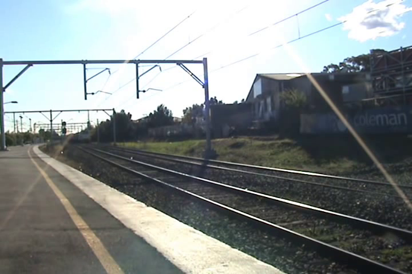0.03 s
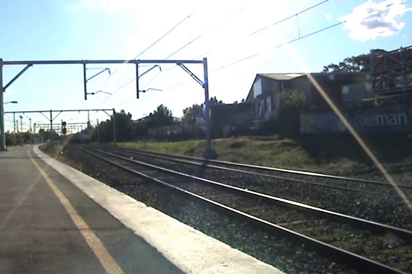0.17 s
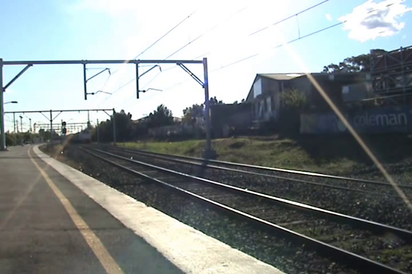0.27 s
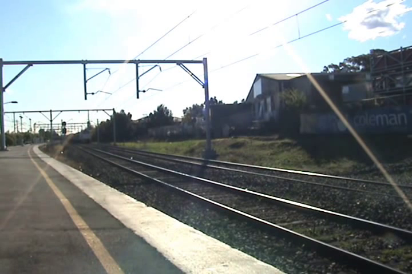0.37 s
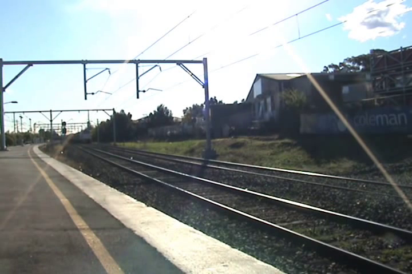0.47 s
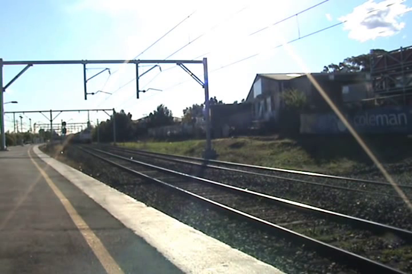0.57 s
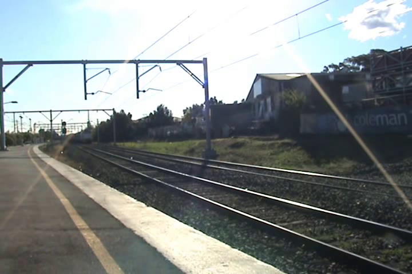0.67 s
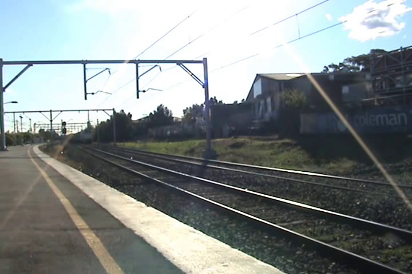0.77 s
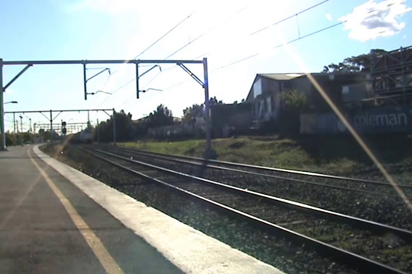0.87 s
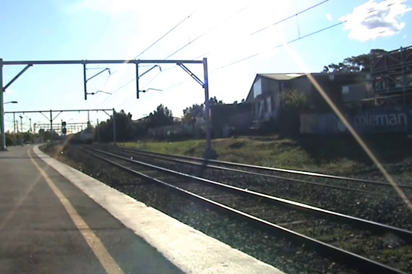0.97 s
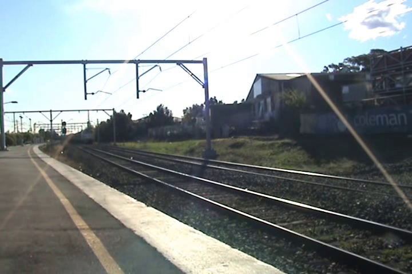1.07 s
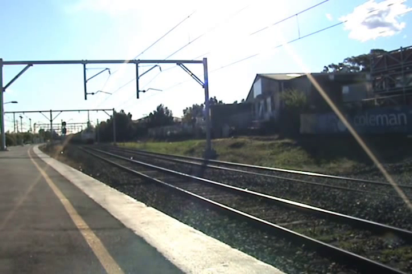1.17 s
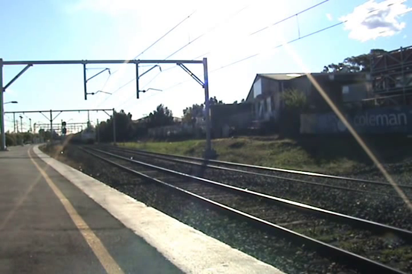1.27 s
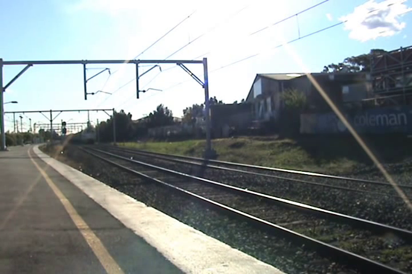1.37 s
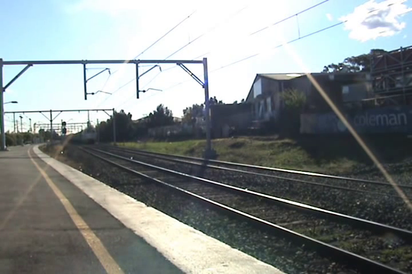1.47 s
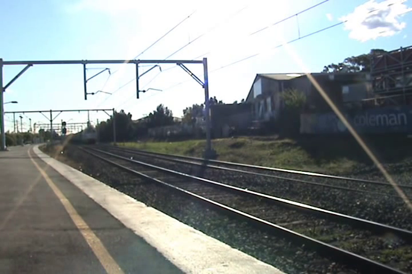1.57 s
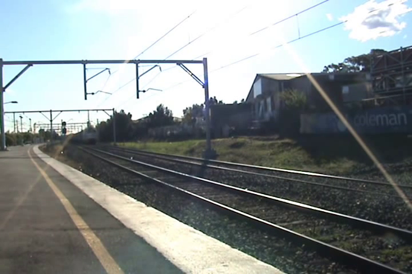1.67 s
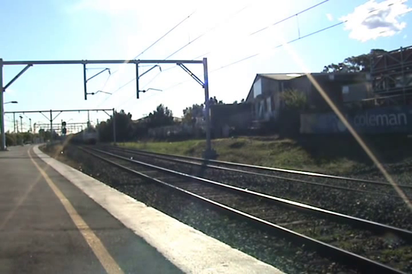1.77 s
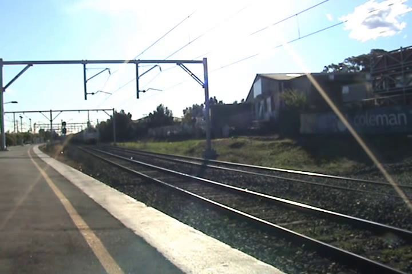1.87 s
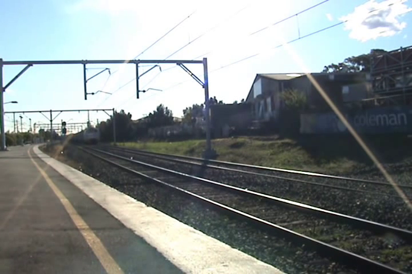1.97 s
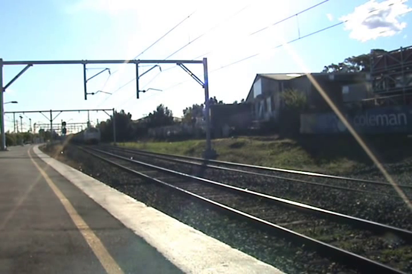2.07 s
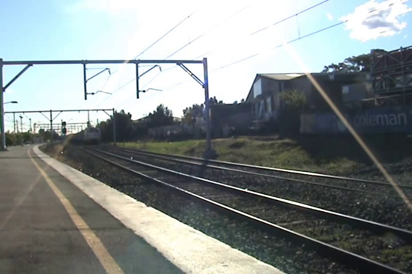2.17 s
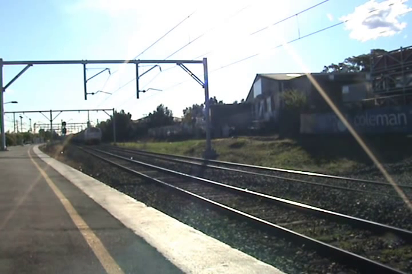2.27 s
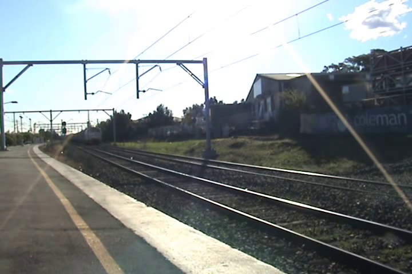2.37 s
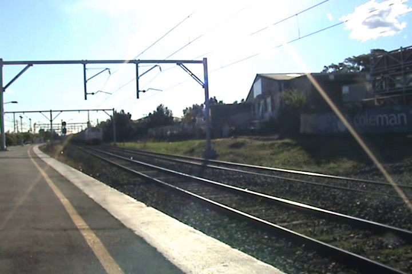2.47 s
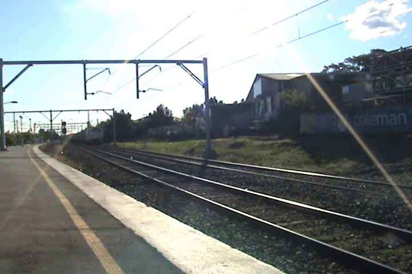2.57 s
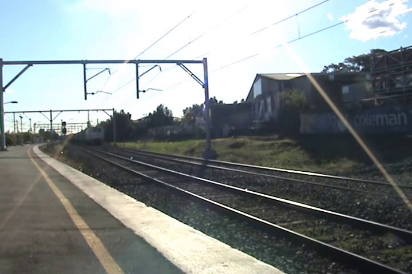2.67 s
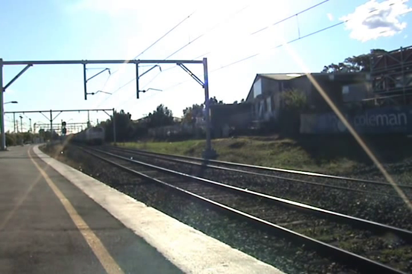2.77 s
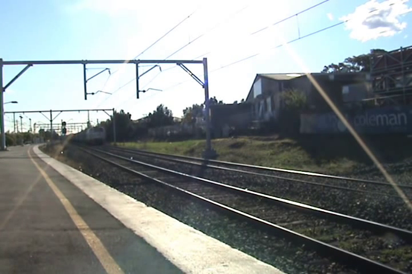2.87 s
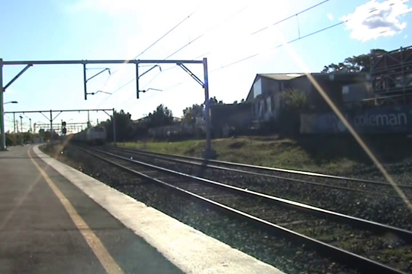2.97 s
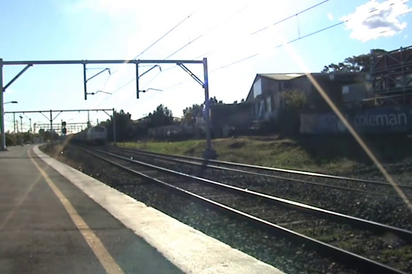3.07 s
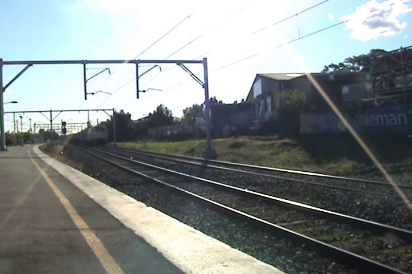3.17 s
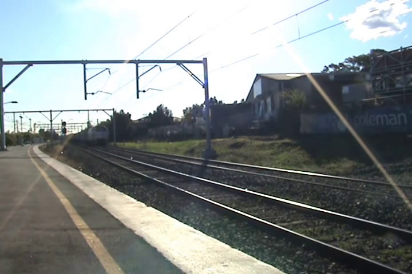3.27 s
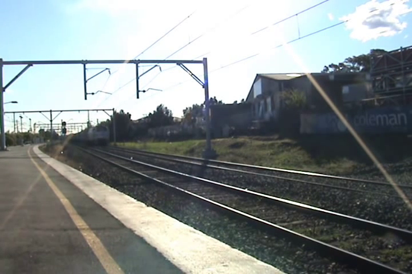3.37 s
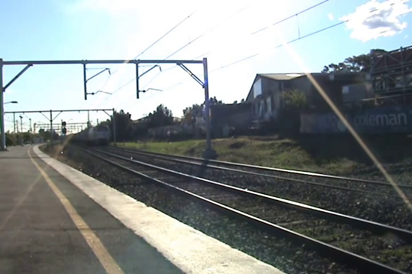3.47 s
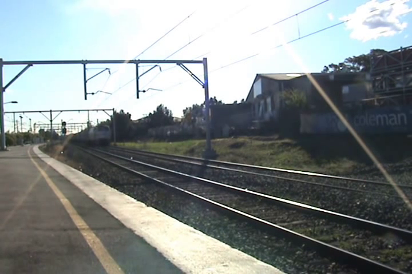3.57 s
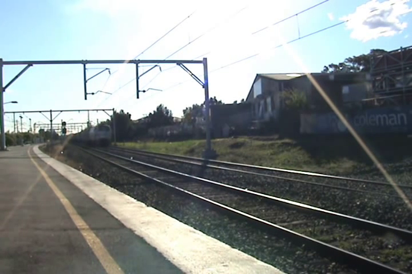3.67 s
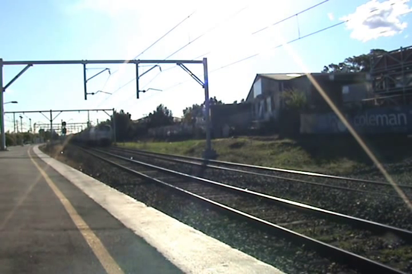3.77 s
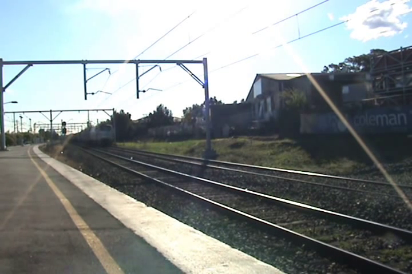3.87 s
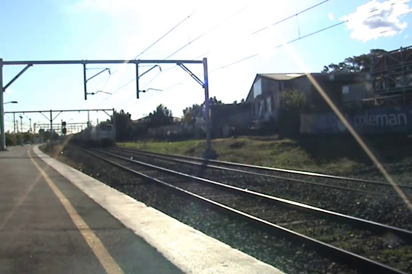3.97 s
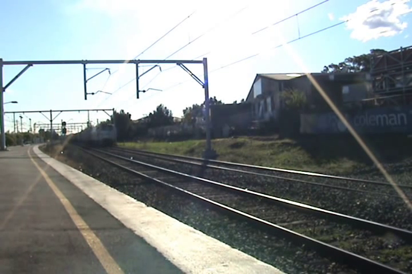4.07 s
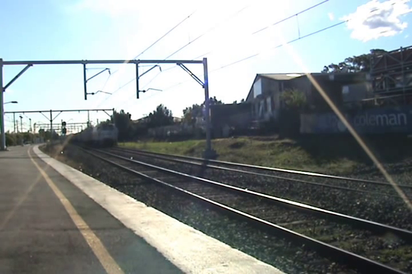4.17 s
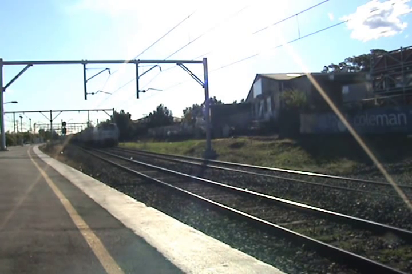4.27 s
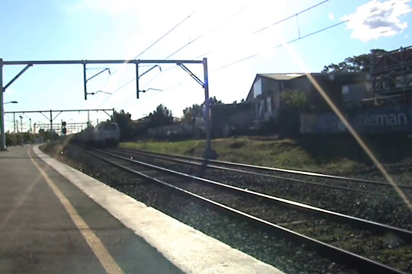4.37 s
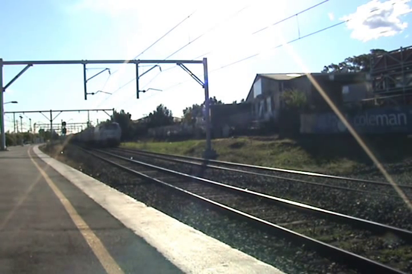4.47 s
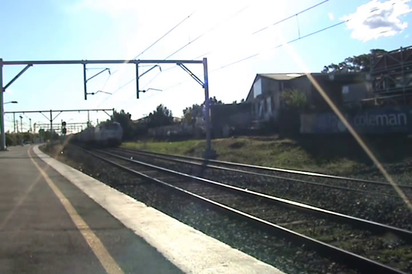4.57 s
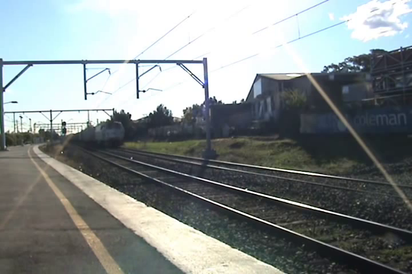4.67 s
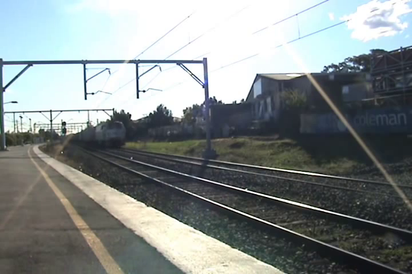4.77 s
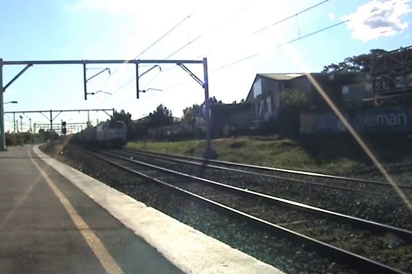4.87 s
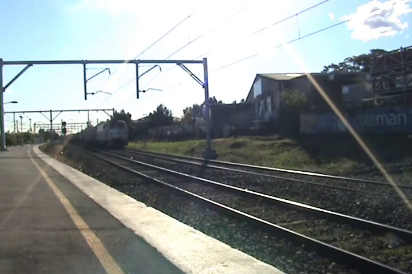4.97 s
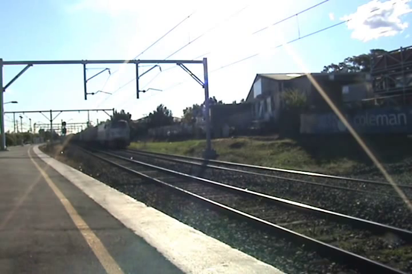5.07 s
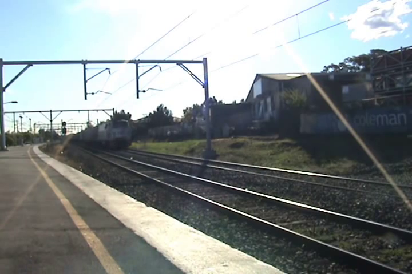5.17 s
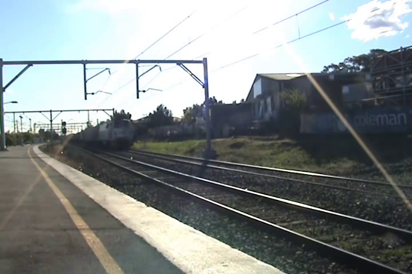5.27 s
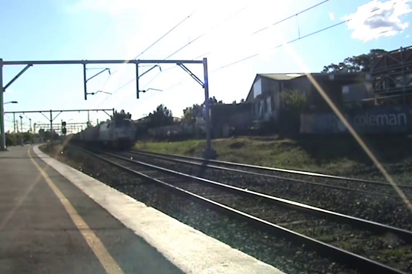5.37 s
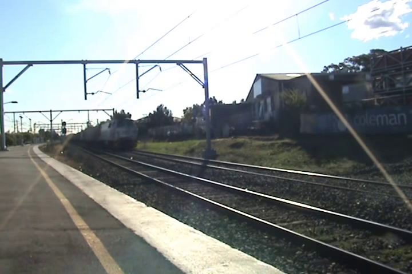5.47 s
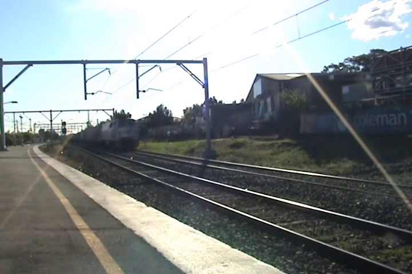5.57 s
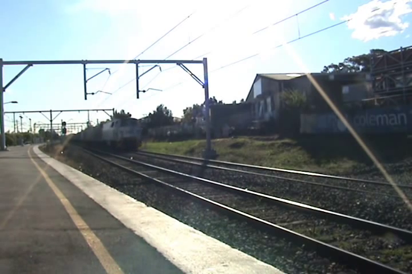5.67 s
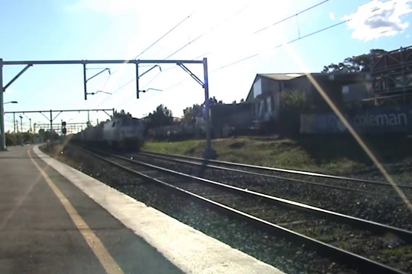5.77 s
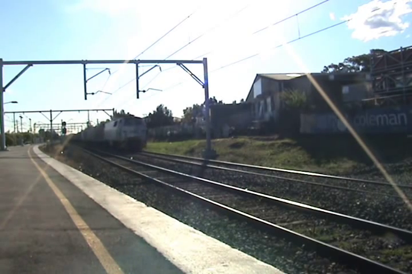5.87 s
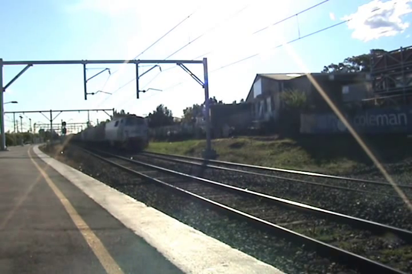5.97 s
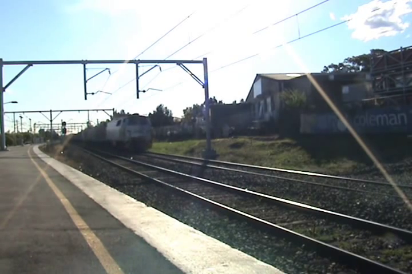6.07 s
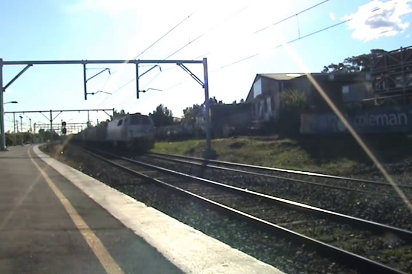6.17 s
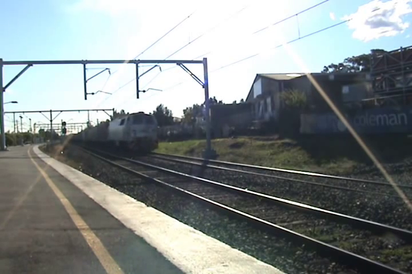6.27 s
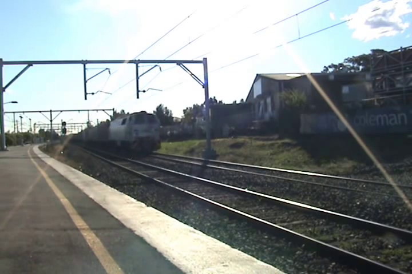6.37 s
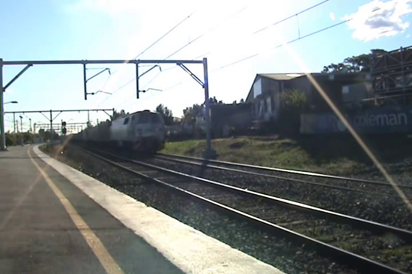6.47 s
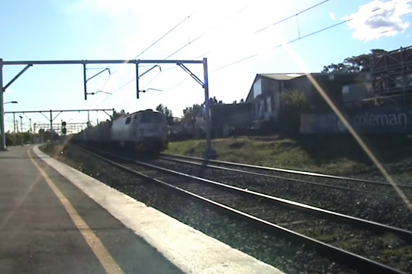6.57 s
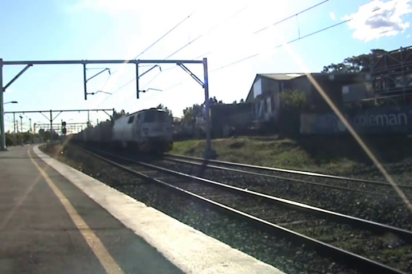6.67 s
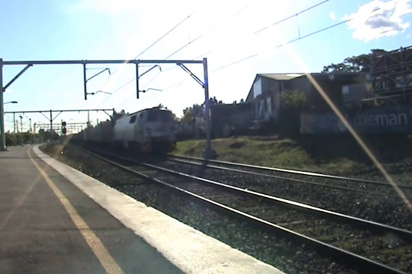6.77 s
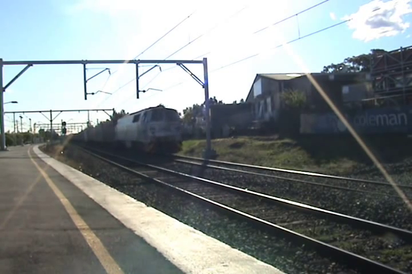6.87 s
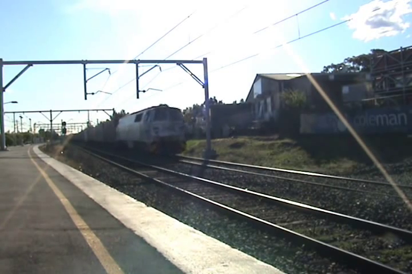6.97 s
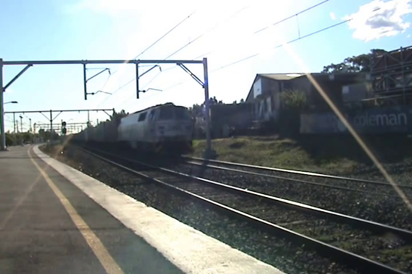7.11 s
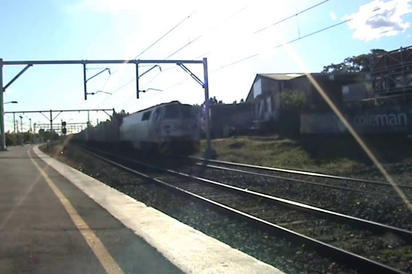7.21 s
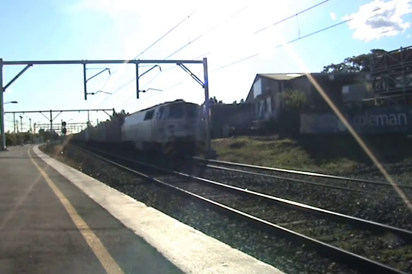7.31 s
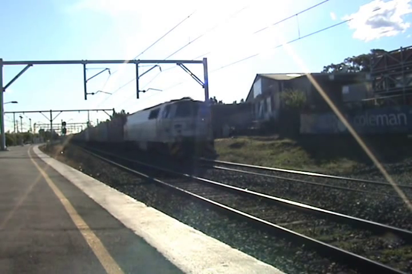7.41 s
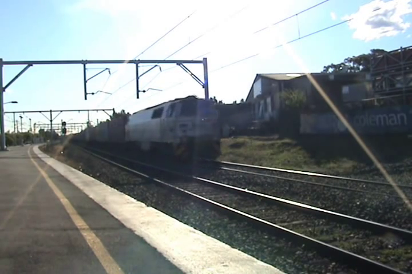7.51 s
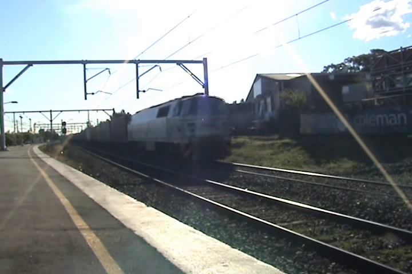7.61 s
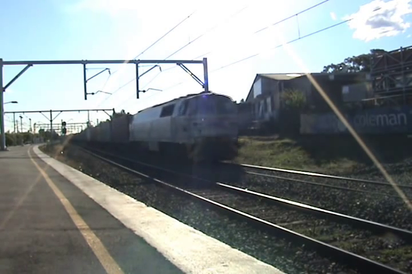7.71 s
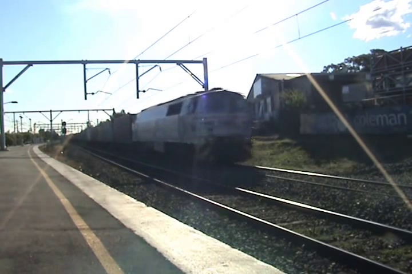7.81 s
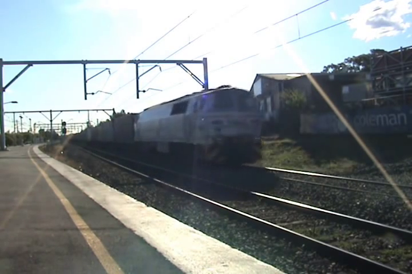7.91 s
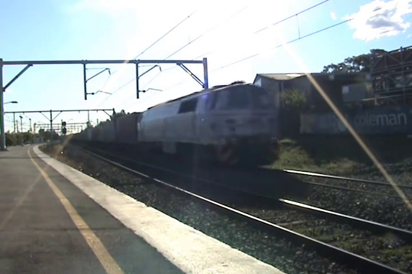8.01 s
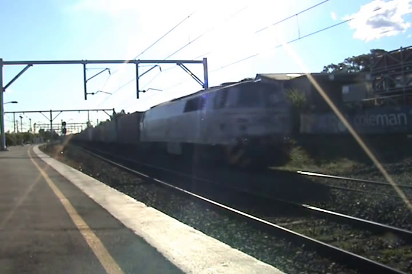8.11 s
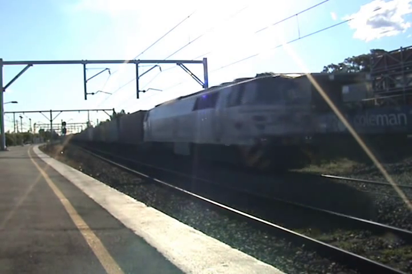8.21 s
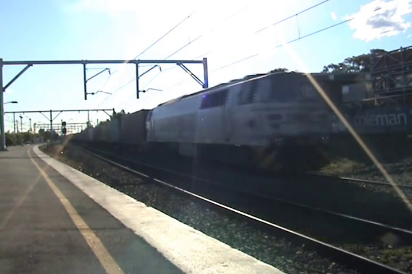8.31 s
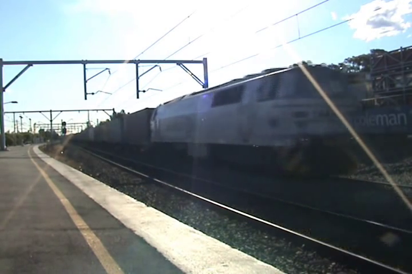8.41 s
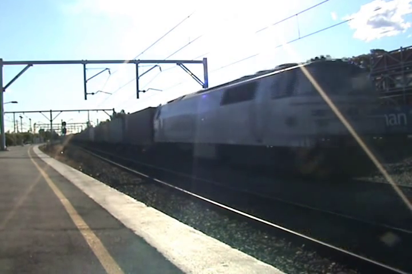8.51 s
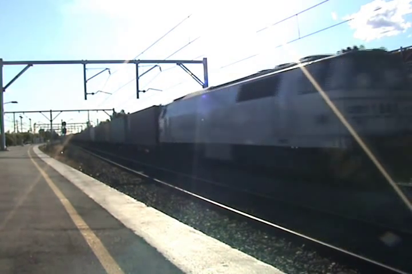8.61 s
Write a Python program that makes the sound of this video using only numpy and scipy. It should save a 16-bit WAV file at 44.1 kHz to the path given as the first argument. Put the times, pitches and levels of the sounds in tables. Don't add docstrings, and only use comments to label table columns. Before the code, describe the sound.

Quiet town hiss, a far hollow bang, then an approaching freight engine's deep throb, roaring wheels, joint clacks and thin metallic singing as it draws level.

```python
import sys
import numpy as np
from scipy import signal
from scipy.fft import rfft, irfft, next_fast_len
from scipy.io import wavfile
from scipy.ndimage import uniform_filter1d

SR = 44100
rng = np.random.default_rng(int(sys.argv[2]) if len(sys.argv) > 2 else 0)


def to_linear_factor(level_db):
    exponent = np.asarray(level_db, float) / 20
    return 10 ** exponent


def int16_out(signal):
    q = np.round(np.clip(np.atleast_2d(signal).T, -1, 1) * 32767)
    wavfile.write(sys.argv[1], SR, q.astype(np.int16))


N = 381465
T = np.arange(N) / SR

# time in seconds, level in dB.
AIR_LEVEL = [(0, -57.5), (1.05, -56), (1.3, -61), (4, -69), (8.65, -61)]
# time in seconds, pitch in Hz, level in dB.
TWITTER_LINE = [(0.04, 8200, -71), (0.12, 8180, -67), (.58, 8120, -70), (0.85, 8200, -65), (1.0, 8120, -64),
                (1.14, 7950, -67)]
# time in seconds, pitch in Hz, level in dB.
SQUEAL_LINE = [
    (0, 3780, -57),
    (.3, 3720, -52),
    (.48, 3690, -54),
    (.68, 3650, -64),
]
# pitch in Hz, width in Hz, level in dB.
BANG_MODES = [(75, 35, -5.5), (202, 33, 5.5), (420, 160, 6), (675, 270, -1), (1130, 440, -5.5),
              (2400, 1200, -25), (4500, 1600, -32)]
BANG_S, BANG_DB, BANG_T60 = 1.036, -17.5, 1
THUD_HZ, THUD_DB, THUD_T60 = 85, 1, 0.14
HOLLOW_T60 = 0.7

# time in seconds, dB over the far level.
NEARNESS_CURVE = [(0, -1), (1, 1), (2, 3.5), (3.4, 6), (4.4, 7.5), (5.6, 8.5), (6.4, 10.5), (7.4, 14),
                  (7.95, 15.5), (8.2, 17), (8.65, 17.5)]
# far level in dB, gain per dB of nearness, bend per dB squared.
BOOM_GROWTH = (-29, 0.94, 0.001)
ROAR_GROWTH = (-32.5, 0.78, 0.0048)
HISS_GROWTH = (-52, 0.95, 0.018)
# frequency in Hz, density in dB per Hz.
RUSH_COLOUR = [(15, -42), (25, -19), (50, 3.5), (87, -3), (107, -1), (130, -10.5), (170, -25), (290, -120)]
BOOM_COLOUR = [(79, -45), (135, -3), (204, -4), (248, -3.5), (307, -2.5), (354, -2.5), (440, -11),
               (570, -33.5), (970, -120)]
ROAR_COLOUR = [(270, -32), (460, 3.5), (845, -1), (1390, -7), (1890, -8), (2260, -10), (2450, -10),
               (2980, -12), (3900, -20), (5070, -40), (8580, -120)]
HISS_COLOUR = [(2410, -16), (4100, -1.5), (4600, -1), (5090, -4), (6150, -7.5), (9500, -18.5), (10300, -21),
               (13400, -43), (22000, -120)]
# pitch in Hz, width in Hz, far and near lift over noise in dB.
BODY_RINGS = [(262, 28, 0.42, 6.7), (360.6, 27, 2.2, 5.3), (391, 20, 3.4, 4.3), (1874, 52, 4.6, 3),
              (2440, 94, 3.3, 3.6), (2990, 180, 0.68, 4.4), (4700, 36, 1, 1.7)]
# time in seconds, peak in dB over the hiss.
JOINT_HITS = [(1.83, 5), (2.24, -2), (3.9, -1), (4.445, 9), (5.24, 6), (5.8376, 4), (6.3784, 7),
              (6.4348, 5), (6.5745, 6), (6.8488, 3), (7.0384, -2), (7.3941, 0), (7.4859, -3), (7.647, 3),
              (8.005, 1), (8.0576, 9.5), (8.285, 7.5), (8.4946, -11)]
JOINT_RISE_S, JOINT_T60 = 0.014, 0.25
# time in seconds, swell in dB.
CAR_LURCHES = [(0, -6), (1.5, 4), (3.1, 4), (5.35, 4.5), (6.6, 1), (6.98, -1.5), (7.28, 1.9), (7.58, 1),
               (8.15, -2.5), (8.55, 2)]
LURCH_S = 0.07
BOOM_LATE_DB = -0.5
CLEAR_S, CLEAR_DB, CLEAR_WIDTH_S = 5.6, 3.5, 0.9

# time in seconds, pitch in Hz, level in dB.
GEAR_WHINE = [(2.5, 400, -47), (4, 363, -37.5), (5, 352, -29.5), (6.2, 364, -26), (6.8, 361.3, -20.5),
              (7.5, 349, -16), (8, 364, -21), (8.65, 350, -22.5)]
# start in seconds, length in seconds, pitch in Hz, level in dB.
FLANGE_CRIES = [(6.36, .08, 3050, -35), (7.99, .09, 2900, -27), (8.06, .26, 2920, -31),
                (7.97, .24, 2580, -28), (8.14, .2, 2500, -27), (8.28, .25, 2430, -31),
                (8.37, .14, 1950, -30)]
SLIDE_PER_S, SONG_EDGE_DB = 0.12, -12
# time in seconds, pitch in Hz, level in dB.
BODY_DRONE = [
    (8.25, 262, -32),
    (8.45, 256, -19),
    (8.65, 250, -18),
]

# time in seconds, engine cycles per second.
ENGINE_CYCLE = [(0, 5.52), (1.2, 5.42), (2.7, 5.28), (3.7, 5.185), (5.2, 5.05), (6.2, 4.97), (7.2, 4.9),
                (8.65, 4.78)]
# time in seconds, level in dB.
EXHAUST_LEVEL = [(0, -28.5), (1, -26), (3, -20), (5, -18), (5.7, -18), (6.2, -15), (7.2, -14), (8.2, -16.5),
                 (8.65, -18.5)]
# frequency in Hz, level in dB.
PIPE_COLOUR = [(35, -19), (50, -15), (70, -12), (92, -11), (115, -12), (128, -24)]
# time in seconds, turns for orders below the split, turns for those above.
THROB_PLACE = [(0, .85, .9), (5.55, .85, .9), (6.1, .85, .72), (8.65, .85, .72)]
SPLIT_ORDER = 16.5
# time and length in seconds, Hz, lift in dB.
WALL_LIFTS = [(1.5, 2.6, 80, 9), (3.3, 2.0, 98, 10), (4.5, 1.6, 70, 7), (5.0, 1.2, 101, 6),
              (5.9, 1.4, 52, 7), (6.3, 1.0, 72, 9), (6.6, 2.2, 113, 12), (7.3, 1.0, 64, 6),
              (7.9, 2.0, 92, 11)]
LIFT_WIDTH_HZ = 6.5
SCATTER_FAR, SCATTER_NEAR, BUNCHED_S = 0.4, 0.16, 5.0

# frequency in Hz, likeness 0-1, radians the left leads, left over right in dB.
MIC_PORTS = [(30, 1, 0.36, 5.5), (99, 1, -0.99, 3.5), (161, 1, -1.33, 2.5), (388, 0.97, -1.58, 1.9),
             (855, 0.94, -1.25, 1.1), (1600, 0.87, -0.69, 0.7), (3200, 1, -0.5, 0.5),
             (6500, 0.94, -0.32, 0.5)]


def evened(x):
    return x / np.sqrt(np.mean(x ** 2) + 1e-20)


def read(points, hz, axis=1):
    table = np.transpose(points)
    return np.interp(np.log(hz + 1), np.log(table[0] + 1), table[axis])


def curve(rows, axis):
    table = np.transpose(rows)
    return np.interp(T, table[0], table[axis])


def hump(t, centre, length):
    return np.exp(-(2 * (t - centre) / length) ** 2)


def add(mix, s, sound):
    part = mix[round(s * SR):][:len(sound)]
    part += sound[:len(part)]


def drift(top_hz, count):
    hz = rng.uniform(0.0588, 1, (count, 12, 1)) * top_hz
    start = rng.random((count, 12, 1))
    coarse = np.sin(2 * np.pi * (hz * T[::256] + start)).sum(1) / np.sqrt(6)
    return np.array([np.interp(T, T[::256], row) for row in coarse])


def resonate(x, hz, width):
    turn = np.exp(2j * np.pi * np.cumsum(hz * np.ones(len(x))) / SR)
    r = np.exp(-np.pi * width / SR)
    return 2 * (turn * signal.lfilter([1 - r], [1, -r], x / turn)).real


def whistle(rows, width, waver):
    on = (T > rows[0][0]) & (T < rows[-1][0])
    hz = (curve(rows, axis=1) * (1 + waver * drift(12, count=1)[0]))[on]
    line = resonate(resonate(rng.standard_normal(N)[on], hz, width), hz, width)
    out = np.zeros(N)
    out[on] = to_linear_factor(curve(rows, axis=2)[on]) * evened(line)
    return out


def noise(colour, patchy_db, flicker_db, brighten_db=0, size=1024):
    frames, hz = 4 * N // size + 5, np.fft.rfftfreq(size, 1 / SR)
    a, b, c, d, patches = rng.standard_normal((frames, len(hz), 5)).T
    patches = evened(uniform_filter1d(uniform_filter1d(patches, 12, 0), 12, 1))
    flicker = evened(uniform_filter1d(rng.standard_normal(frames), 6))
    near = np.linspace(0, 1, frames) ** 2
    pitch = 1.01 - 0.052 * near ** 8
    rings_db = 0
    for f, width, far, close in BODY_RINGS:
        rings_db = rings_db + (far + (close - far) * near) / (1 + (2 * (hz[:, None] - f * pitch) / width) ** 2)
    tilt_db = brighten_db * near * np.log2(hz[:, None] / 1500 + 0.58)
    same = np.clip(read(MIC_PORTS, hz), 0, 1)[:, None]
    left = a + 1j * b
    right = same * left + np.sqrt(1 - same ** 2) * (c + 1j * d)
    z = np.array([left, right])
    z *= to_linear_factor(read(colour, hz)[:, None] + rings_db + tilt_db + patchy_db * patches + flicker_db * flicker)
    z /= np.sqrt(uniform_filter1d((abs(z) ** 2).sum((0, 1)), 200))
    return evened(signal.istft(z, nperseg=size, noverlap=3 * size // 4)[1][:, :N])


def town_air():
    hiss = rng.standard_normal(N) + 0.15 * rng.standard_normal((2, N))
    return to_linear_factor(curve(AIR_LEVEL, axis=1)) * hiss


def twitter():
    flutter = to_linear_factor(1.8 * drift(16, count=1)[0])
    return flutter * whistle(TWITTER_LINE, width=300, waver=0.008)


def squeal():
    hz = curve(SQUEAL_LINE, axis=1) * (1 + 0.0015 * drift(17.0, count=1)[0])
    level_db = curve(SQUEAL_LINE, axis=2) + 3.5 * drift(11, count=1)[0]
    return to_linear_factor(level_db) * np.sin(2 * np.pi * np.cumsum(hz) / SR) * (T < SQUEAL_LINE[-1][0])


def bang():
    since, burst, out = T[:SR], rng.standard_normal(SR), np.zeros(N)
    body = np.zeros(SR)
    for hz, width, db in BANG_MODES:
        body += to_linear_factor(db) * evened(resonate(resonate(burst, hz, 1.6 * width), hz, 1.6 * width))
    distance = signal.butter(4, 6000, fs=SR, output="sos")
    body = signal.sosfilt(distance, evened(body))
    beat = 0.7 + 0.32 * np.cos(2 * np.pi * 10 * (since - 0.03))
    hollow = to_linear_factor(1.5 - 60 * since / HOLLOW_T60) * np.sin(2 * np.pi * 200 * since) * beat
    decay = to_linear_factor(BANG_DB - 60 * since / BANG_T60) * (1 - np.exp(-since / 0.0021))
    add(out, BANG_S, decay * (body + hollow))
    thud = to_linear_factor(BANG_DB + THUD_DB - 60 * since / THUD_T60) * np.sin(2 * np.pi * THUD_HZ * since)
    add(out, BANG_S + 0.01, thud)
    return out


def sway_db():
    return sum(db * hump(T, s, 2 * LURCH_S) for s, db in CAR_LURCHES)


def flange(s, length, hz, db):
    low = hz * (1 - SLIDE_PER_S * length)
    rows = [(s, hz, db + SONG_EDGE_DB),
            (s + 0.34 * length, (hz + low) / 2, db),
            (s + length, low, db + SONG_EDGE_DB)]
    return whistle(rows, width=100, waver=0.013)


def metal():
    whine = to_linear_factor(2.1 * sway_db()) * whistle(GEAR_WHINE, width=41, waver=0.0084)
    songs = sum(flange(*row) for row in FLANGE_CRIES)
    return whine + songs + whistle(BODY_DRONE, width=27, waver=0.012)


def joints():
    lift, since = np.zeros(N), T[:SR // 2]
    for s, db in JOINT_HITS:
        add(lift, s, to_linear_factor(db - 60 * since / JOINT_T60) * (1 - np.exp(-since / JOINT_RISE_S)))
    return lift


def layer_gain(law):
    far_db, slope, bend = law
    near_db = curve(NEARNESS_CURVE, axis=1)
    return to_linear_factor(far_db + slope * near_db + bend * near_db ** 2)


def rolling():
    lift = np.hypot(1, joints())
    swell_db = 0.44 * sway_db() + BOOM_LATE_DB * (T / T[-1]) ** 12
    boom = to_linear_factor(swell_db) * noise(BOOM_COLOUR, patchy_db=-0.22, flicker_db=0.33, size=2048)
    roar = lift ** 0.25 * noise(ROAR_COLOUR, patchy_db=0.26, flicker_db=0.77, brighten_db=3.5)
    clearing = to_linear_factor(CLEAR_DB * np.tanh((T - CLEAR_S) / CLEAR_WIDTH_S) / 2)
    hiss = clearing * lift * noise(HISS_COLOUR, patchy_db=0.46, flicker_db=0.8)
    return layer_gain(BOOM_GROWTH) * boom + layer_gain(ROAR_GROWTH) * roar + layer_gain(HISS_GROWTH) * hiss


def exhaust():
    cycle, orders, slow = curve(ENGINE_CYCLE, axis=1), np.arange(7, 26), T[::256]
    turns = np.cumsum(cycle) / SR
    fade, slip = drift(0.548, count=len(orders)), drift(0.21, count=len(orders))
    scatter = rng.uniform(-1, 1, len(orders))
    stray = np.interp(T, [0, BUNCHED_S], [SCATTER_FAR, SCATTER_NEAR])
    low, high = curve(THROB_PLACE, axis=1), curve(THROB_PLACE, axis=2)
    tones = np.zeros(N)
    for i, order in enumerate(orders):
        hz = order * cycle[::256]
        level_db = read(PIPE_COLOUR, hz)
        for s, length, f, db in WALL_LIFTS:
            level_db = level_db + db * hump(slow, s, length) * hump(hz, f, 2 * LIFT_WIDTH_HZ)
        place = low if order < SPLIT_ORDER else high
        phase = order * (turns - place) + stray * scatter[i] + 0.07 * slip[i]
        tones += to_linear_factor(np.interp(T, slow, level_db) + 2.2 * fade[i]) * np.cos(2 * np.pi * phase)
    tones /= np.sqrt(uniform_filter1d(tones ** 2, SR))
    rush = to_linear_factor(-5.5) * noise(RUSH_COLOUR, patchy_db=1.2, flicker_db=0.3, size=4096)
    return to_linear_factor(curve(EXHAUST_LEVEL, axis=1)) * (to_linear_factor(-3.5) * tones + rush)


def scene():
    small = twitter() + squeal() + bang()
    return town_air() + small + metal() + rolling() + exhaust()


def starve(x):
    hz, t, z = signal.stft(x, SR, nperseg=2048)
    power = (abs(z) ** 2).mean(0)
    loud_db = 10 * np.log10(uniform_filter1d(power.sum(0), 20))
    band_db = 10 * np.log10(power[:1024].reshape(256, 4, -1).mean(1) + 1e-20)
    shared_db = 1.5 * evened(uniform_filter1d(rng.standard_normal(len(t)), 6))
    ragged = uniform_filter1d(uniform_filter1d(rng.standard_normal((len(t), 256)), 3, 0), 3, 1).T
    budget_db = shared_db + 2.5 * evened(ragged)
    treble_db = 2.4 * (hz[2::4, None] - 10000) / 1000
    limit_db = -89.5 + 0.98 * (loud_db + 23.0) + budget_db + treble_db
    kept = np.repeat(band_db > limit_db, 4, axis=0)
    return signal.istft(z * np.vstack([kept, kept[-1:]]), SR, nperseg=2048)[1][:, :N]


def roll_off(x):
    return signal.sosfilt(signal.butter(12, 16130, fs=SR, output="sos"), x)


def record(dry):
    size = next_fast_len(N + SR)
    hz = np.fft.rfftfreq(size, 1 / SR)
    half = to_linear_factor(read(MIC_PORTS, hz, axis=3) / 2) * np.exp(0.5j * read(MIC_PORTS, hz, axis=2))
    edge = to_linear_factor(1.5) / (1 + (hz / 10950) ** 60) * (hz < SR / 4)
    ports = irfft(rfft(dry, size) * np.array([half, 1 / half]) * edge, size)[:, :N]
    rounded = 1.45 * np.tanh(ports / 1.45)
    held = starve(rounded)[:, abs((np.arange(N) + 1) // 2 * 2 - 1)]
    top = signal.firwin(801, 15780, window=("kaiser", 8), fs=SR)
    mix = signal.oaconvolve(held, top[None], "same")
    return roll_off(mix)


dry = scene()
out = record(dry)
int16_out(out)
```